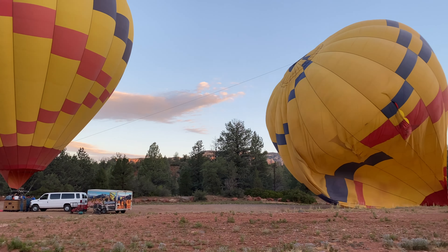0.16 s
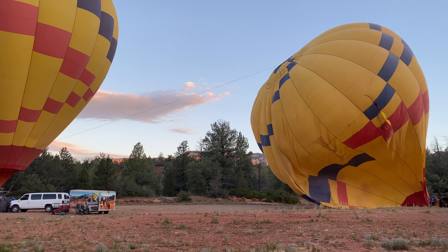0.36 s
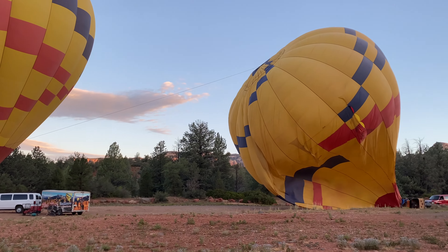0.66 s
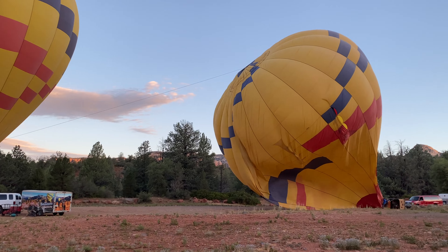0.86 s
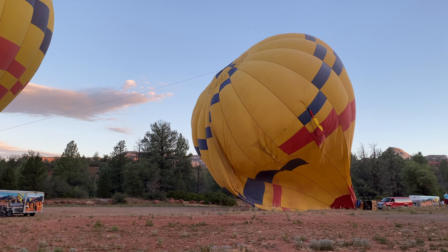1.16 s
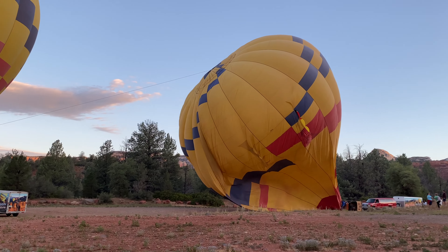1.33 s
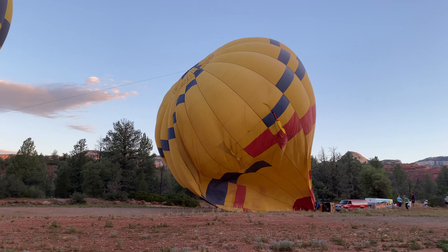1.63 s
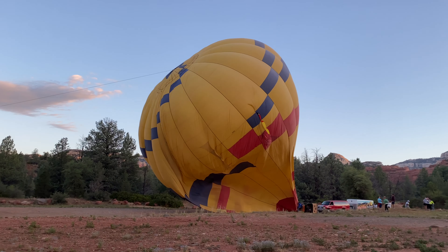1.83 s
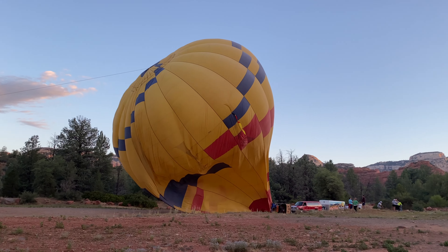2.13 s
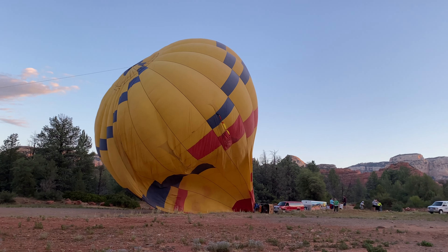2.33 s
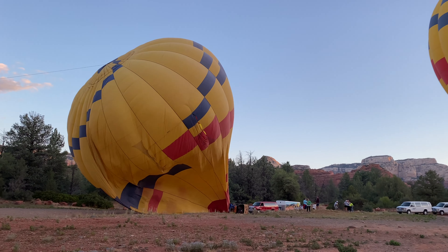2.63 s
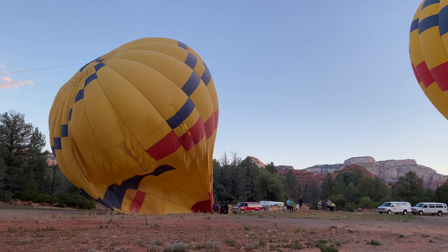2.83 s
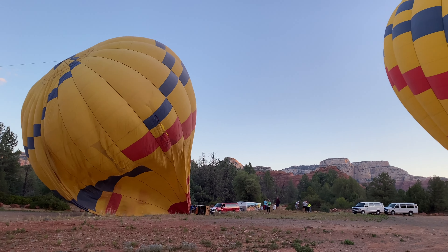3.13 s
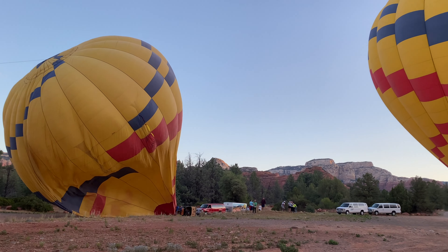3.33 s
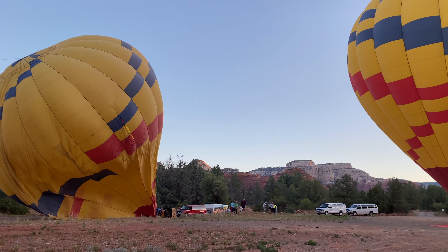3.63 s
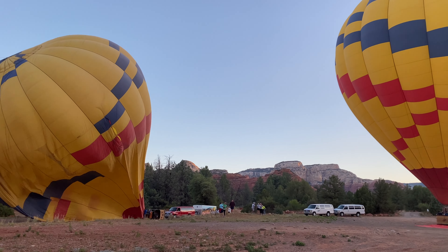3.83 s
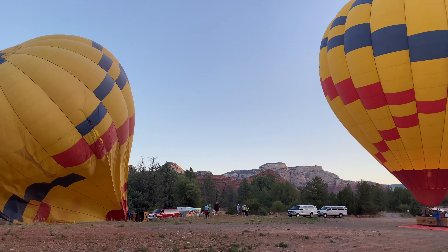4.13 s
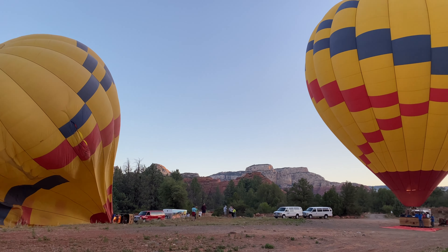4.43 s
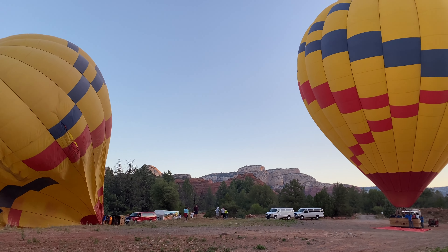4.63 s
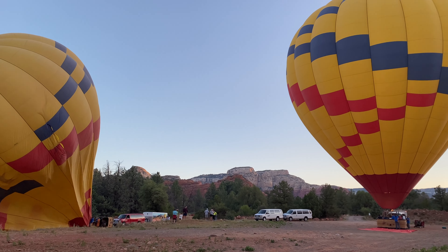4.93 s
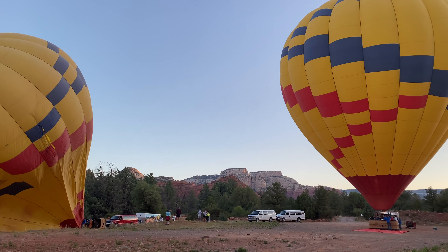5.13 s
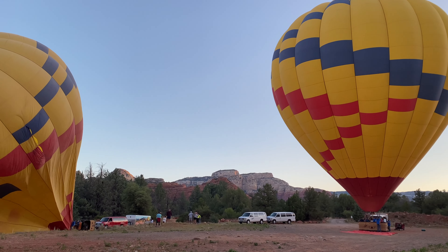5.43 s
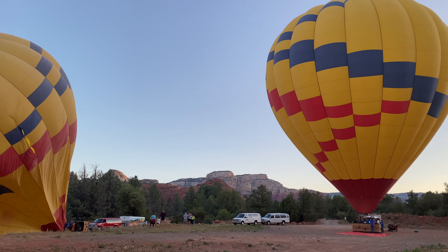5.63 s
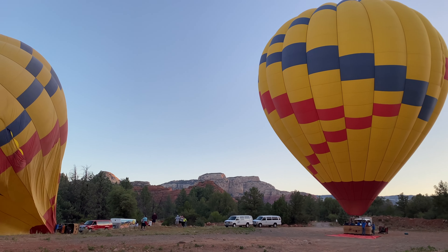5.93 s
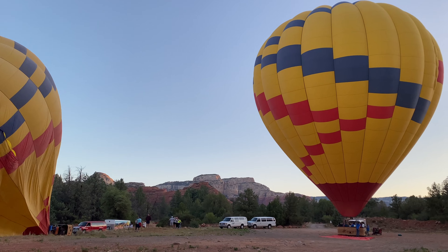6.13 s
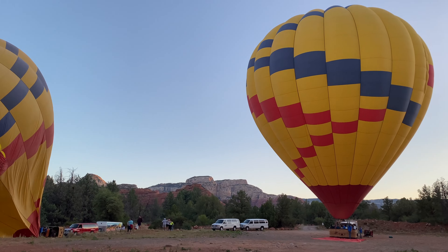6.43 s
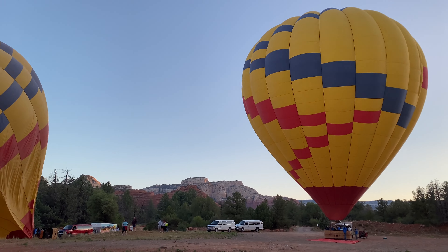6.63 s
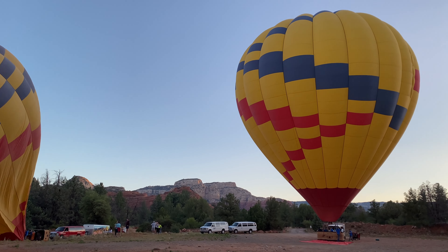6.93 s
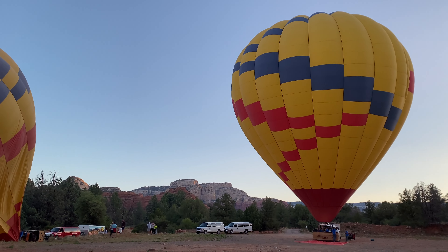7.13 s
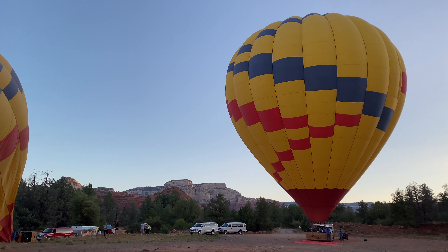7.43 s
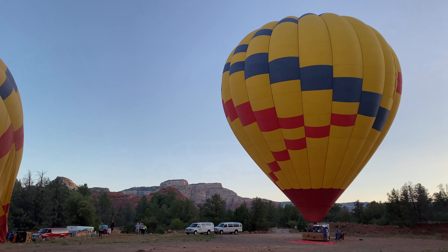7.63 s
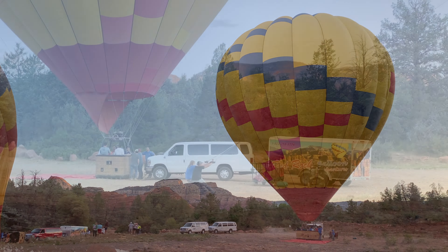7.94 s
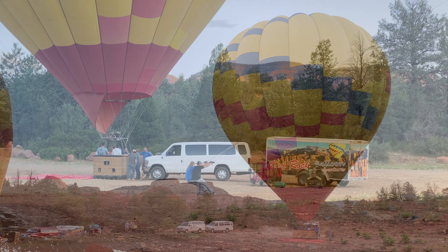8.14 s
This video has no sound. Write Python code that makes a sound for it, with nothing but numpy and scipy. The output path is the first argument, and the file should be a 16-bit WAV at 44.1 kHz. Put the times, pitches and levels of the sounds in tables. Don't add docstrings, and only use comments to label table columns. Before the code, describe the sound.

From 0 s, a small petrol engine drones steadily in an open field, a low, rough buzz with strong tones around 95 to 165 Hz and weaker ones near 300. Its pitch hardly moves. A three-blade fan adds a broad, breathy rush of air, lightly chopped by the engine's rhythm, with faint wavering blade tones. At about 2.3 s a propane burner ignites with a cluster of low thumps; gas hiss opens within a fraction of a second and a flame roar builds over the next second. From 3 to 6 s hiss, roar and lumpy rumble continue over the drone, with irregular dull thuds, stronger near 3.4 and 4.4 s. The jet eases after 6 s and is much thinner by 7.5 to 8 s, while rumble and thuds persist. The stereo image shifts gradually as the hand-held microphone turns. Engine and air continue to a slight fade ending around 8.3 s.

```python
import sys
import numpy as np
from scipy import signal
from scipy.io import wavfile
from scipy.ndimage import uniform_filter1d

SR = 44100
rng = np.random.default_rng(int(sys.argv[2]) if len(sys.argv) > 2 else 0)


def how_loud(loudness_db):
    steps = np.asarray(loudness_db, float) / 20
    return 10 ** steps


def master(y):
    cut = np.clip(np.atleast_2d(y).T, -1, 1)
    pcm = np.round(cut * 32767)
    wavfile.write(sys.argv[1], SR, pcm.astype(np.int16))


N = 364707
T = np.arange(N) / SR

# (time [s], four-stroke cycles [1/s])
CYCLE_RATE = [(0, 23.61), (.5, 23.59), (.75, 23.55), (1.0, 23.55), (1.25, 23.52), (1.5, 23.47),
              (1.75, 23.47), (2.0, 23.53), (3, 23.52), (4.5, 23.57), (6, 23.58), (8.3, 23.55)]
# (multiple of the cycle, level [dB])
EXHAUST_TONES = [(1, -32), (2, -15), (3, -14.5), (4, -4), (5, -9), (6, -2.5), (7, 0.5), (8, -4.5),
                 (9, -10.5), (10, -21), (11, -38), (12, -7), (13, -4), (14, -12), (15, -24.5), (16, -34),
                 (17, -18.5), (18, -13), (19, -25.5), (20, -61), (21, -39), (22, -24.5), (23, -25)]
# (multiple of the blade rate, rms level [dB])
BLADE_TONES = [(7, -86), (8, -52.5), (9, -55.5), (10, -58), (11, -54.5), (12, -68), (14, -59)]
LOAD_PHASE_TURNS = [-0.0046, -.05, 0.32, -0.036, -0.14, 0.52]
# (time [s], depth [dB])
TONE_LULLS = [
    [(0, -7), (1.38, -7), (1.75, -5.5), (3.09, -4), (3.5, -1), (4.1, -7), (5.04, -17.5)],
    [(0, -25), (.62, -4.5), (1.2, -8), (1.91, -9.5), (3.31, -1), (4.3, -21), (4.95, -2)],
    [(1.1, -6), (2.12, -14), (2.5, -18), (3.09, -3), (4.25, -17), (4.9, -4), (6.8, -5), (8.2, -13)],
]
# (time [s], level [dB])
AIR_LEVEL = [(0, -42.5), (2.7, -43), (3.8, -45), (6.2, -44.5), (8.27, -42.5)]
# (frequency [Hz], density [dB/Hz])
AIR_SPECTRUM = [(30, -30), (55, 1), (150, -3.5), (330, -3), (480, -6), (2000, -0.5), (3000, -9), (4300, -8),
                (5800, -10), (8000, -15.5), (12000, -22.5), (13500, -27), (14500, -33), (17000, -60)]
# (time [s], gas flow [dB], flame size [dB])
BURN_COURSE = [(2.33, -53, -28), (2.41, -51, -20), (2.46, -52.5, -29.5), (2.76, -50, -25.5),
               (3.22, -52, -29), (3.27, -56, -27.5), (3.52, -50.5, -24), (3.69, -53.5, -28.5),
               (4.55, -53.5, -25), (5.97, -56, -27.5), (6.37, -57.5, -32), (7.52, -66.5, -30.5),
               (7.92, -65, -31), (7.95, -70, -30.5), (8.04, -77, -28.5), (8.27, -75, -30.5)]
# (frequency [Hz], density [dB/Hz])
RUMBLE_SPECTRUM = [(18, -39), (30, -26), (59, 3), (128, -1.5), (173, -6), (237, -8.5), (290, -8.5),
                   (467, -24.5), (550, -28.5), (600, -38), (780, -53), (1320, -120)]
# (frequency [Hz], density [dB/Hz])
ROAR_SPECTRUM = [(250, -3), (500, 4), (1000, 6.5), (1600, -2), (2500, -35), (4000, -7.5), (6000, -23)]
# (frequency [Hz], density [dB/Hz])
JET_SPECTRUM = [(1500, -16.5), (3000, -5), (4500, 1.5), (6500, 1.5), (8000, -2.5), (11000, -6.5),
                (13500, -18), (15500, -18), (17000, -40)]
# (time [s], peak [dB], frequency [Hz], push 1 or pull -1)
LARGE_POCKETS = [(2.3309, -15, 215, 1), (2.345, -20, 52, 1), (2.3536, -14, 138, -1), (2.392, -13, 105, 1),
                 (2.4167, -15, 146, 1), (2.715, -18, 113, -1), (2.7475, -17, 120, -1),
                 (2.9361, -13, 135, 1), (3.0762, -14.5, 184, -1), (3.3592, -7.5, 114, -1),
                 (3.427, -14, 124, -1), (3.7837, -17, 152, 1), (4.1243, -14, 126, -1), (4.195, -18, 127, 1),
                 (4.4168, -6.5, 109, -1), (4.719, -11, 165, -1), (4.776, -13, 188, -1),
                 (4.8998, -12, 113, 1), (5.0731, -11.5, 146, -1), (5.116, -14, 130, -1),
                 (5.2933, -13, 142, -1), (5.5624, -15, 174, -1), (5.6465, -21, 151, 1),
                 (6.0093, -15, 152, -1), (6.536, -13.5, 138, 1), (6.7228, -12.5, 128, -1),
                 (7.0686, -17.5, 177, -1), (7.3666, -14, 98, -1), (7.5952, -17, 142, -1),
                 (8.0467, -12, 93, -1)]
# (time [s], heading [0 ahead, 1 fan far left])
MIC_HEADING = [(0, -0.54), (.6, -0.34), (1.15, -0.23), (1.9, -0.056), (2.3, 0.097), (2.9, 0.36),
               (3.7, 0.51), (4.5, 0.65), (5.4, 0.79), (6.3, 0.9), (8.27, 1.01)]
# (frequency [Hz], left lead ahead [rad], lead per turn [rad],
# left minus right ahead [dB], difference per turn [dB])
MID_PORTS = [(310, -0.079, 0.66, -1, 0.5), (2010, -0.32, 3, -4, 3), (2520, .54, 0.1, 2.3, 3.2),
             (3360, -0.78, 4, 5, 3.5), (4620, -1.01, 7, -6.5, 4.5), (5700, -0.56, 8.5, 0, -2.6),
             (6560, -0.31, 11, -11, 4.5), (7840, .75, 15, 2.5, 0)]
LOW_PORTS = [(20, 0, 0, -0.89, 0), (120, -0.031, 0, -1.6, 0)]
# (frequency [Hz], left lead [rad])
HIGH_PORT_LEAD = [(7800, 3.5), (8100, 3.2), (8800, 2.9), (11000, 0), (12300, -1.7), (13000, -3.0),
                  (14000, -3.4), (14800, -4.7)]
# (frequency [Hz], likeness [0-1])
PORT_LIKENESS = [(20, .985), (120, .995), (300, .87), (1200, .85), (4700, .72), (5500, .92), (6300, .74),
                 (7600, .88)]
# (frequency [Hz], turned one way [dB], turned the other way [dB])
BODY_SHADE = [(556, .5, 1), (1170, -3, 2.5), (2340, 0, 0.5), (3060, -1, 2.5), (4070, -2.5, 1),
              (5040, -0.5, 5.5), (5400, -3.5, 0), (6840, 1, -0.5), (8900, 1, -.5)]
# (frequency [Hz], level
# [dB])
WEAK_LIMIT = [(4000, -14), (5500, -12.5), (8400, -9), (10400, -6), (11400, -5.5), (12300, -7.5),
              (13500, -5.5)]
# (time [s], level [dB])
CLOSING_FADE = [(0, 0.5), (7.7, 1), (8.0, -1.5), (8.27, -6)]

EXHAUST_DB = -33
CLEAR_DB, LULL_S = (-52.5, -51.5, -50.5), 0.17
LIT_S, JET_OPEN_S = 2.315, 0.19
FULL_FLOW_DB, FULL_SIZE_DB = -55, -26
ROAR_DB, ROAR_BY_FLOW, ROAR_BY_SIZE, ROAR_LAG_S = -36.5, 0.34, 0.99, 1
ROAR_BUILD_DB, ROAR_BUILD_S = -7.5, 0.6
ROAR_TURN = -1.17
SMALL_COUNT, SMALL_HZ = 40, (86, 194)
SMALL_OVER_DB, SMALL_SPREAD_DB = 9.5, 0.5
SHADE_FROM = (0.035, 0.63)
TREBLE_LIKE, TREBLE_BEST_TURN, TREBLE_LOSS = 0.82, 0.35, 0.35


def evened(x):
    return x / np.sqrt(np.mean(x ** 2) + 1e-20)


def read(points, hz):
    f, *columns = np.transpose(points)
    return np.squeeze([np.interp(np.log(hz + 1), np.log(f + 1), c) for c in columns])


def curves(rows, t):
    s, *columns = np.transpose(rows)
    return np.squeeze([np.interp(t, s, c) for c in columns])


def drift(per_s, count=1):
    t, hz = T[::64], np.geomspace(0.0396 * per_s, per_s, 16)
    phase = rng.random((count, 16, 1))
    waves = np.sin(2 * np.pi * (hz[:, None] * t + phase)) / hz[:, None] ** 0.42
    return np.squeeze([np.interp(T, t, evened(row)) for row in waves.sum(1)])


def rush(colour, patchy_db, size=1024):
    hop = size // 4
    frames, hz = N // hop + 5, np.fft.rfftfreq(size, 1 / SR)
    a, b, c, d, patches = rng.standard_normal((frames, len(hz), 5)).T
    patches = evened(uniform_filter1d(uniform_filter1d(patches, 8, 0), 16, 1))
    level_db = read(colour, hz)[:, None] + patchy_db * patches
    z = np.array([a + 1j * b, c + 1j * d]) * how_loud(level_db)
    return evened(signal.istft(z, nperseg=size, noverlap=size - hop)[1][:, :N])


def fan():
    air_db = curves(AIR_LEVEL, T)
    rate = curves(CYCLE_RATE, T) * (1 + 0.0004 * drift(8))
    turns = np.cumsum(rate) / SR - 0.02
    late = np.array([[0], [0.25]])

    def order(k, db):
        k = int(k)
        blade = (k + 2) // 6
        spread = 0.13 * max(blade - 3, 0) ** 2
        stroke = 0.46 - 0.3875 * blade + LOAD_PHASE_TURNS[k % 6] + spread
        return how_loud(db) * np.cos(2 * np.pi * (k * turns + stroke + late))

    exhaust_sway = drift(5, count=len(EXHAUST_TONES))
    beats = sum(order(k, db + 0.6 * s) for (k, db), s in zip(EXHAUST_TONES, exhaust_sway))

    blade_sway = drift(9, count=len(BLADE_TONES))
    blades = sum(order(6 * k, db + 3.2 * s) for (k, db), s in zip(BLADE_TONES, blade_sway))
    clear_sway = drift(6, count=3)
    for k, db, rows, sway in zip((4, 5, 6), CLEAR_DB, TONE_LULLS, clear_sway):
        lull_db = sum(depth * np.exp(-((T - s) / LULL_S) ** 2) for s, depth in rows)
        blades = blades + order(6 * k, db + lull_db + 1.6 * sway + 2.5)

    once, twice, stroke = (np.cos(2 * np.pi * k * turns) for k in (1, 2, 6))
    chop = 1 + 0.23 * once + 0.033 * twice
    gate = 1 + 0.07 * once + 0.042 * twice + 0.055 * stroke
    air = how_loud(air_db + 4) * gate * rush(AIR_SPECTRUM, patchy_db=0.82)
    return how_loud(EXHAUST_DB - 0.17) * evened(beats) + np.sqrt(2) * chop * blades + air


def burner():
    flow_db, size_db = curves(BURN_COURSE, T)
    since_s = np.maximum(T - LIT_S, 0)
    lit = np.minimum(since_s / 0.02, 1)
    jet_open = np.minimum(since_s / JET_OPEN_S, 1)

    slow_db = uniform_filter1d(size_db, max(int(ROAR_LAG_S * SR), 1))
    roar_db = ROAR_DB + ROAR_BY_FLOW * (flow_db - FULL_FLOW_DB)
    roar_db = roar_db + ROAR_BY_SIZE * (slow_db - FULL_SIZE_DB)
    roar_db = roar_db + ROAR_BUILD_DB * np.exp(-since_s / ROAR_BUILD_S)

    swings, rule = thumps(size_db)
    lumps = evened(uniform_filter1d(uniform_filter1d(rng.standard_normal(N), 500), 500))
    flicker = drift(21)
    rumble = evened(how_loud(0.54 * lumps) * rush(RUMBLE_SPECTRUM, patchy_db=0.56, size=2048))
    rumble = rumble * (1 - 0.68 * rule)
    roar = how_loud(0.1 * flicker) * rush(ROAR_SPECTRUM, patchy_db=1.5)
    jet = how_loud(0.5 * flicker + 0.22 * lumps) * rush(JET_SPECTRUM, patchy_db=1.0)

    flame = lit * how_loud(size_db + 0.06) * rumble + jet_open * how_loud(flow_db + 9) * jet + swings
    return flame, lit * how_loud(roar_db - 1.5) * roar


def thumps(size_db):
    out, rule = np.zeros(N + SR), np.zeros(N + SR)
    t = np.arange(-1500, 2000) / SR
    when, strength, pitch, push = rng.random((SMALL_COUNT, 4)).T
    span_s = T[-1] - LIT_S - 0.2
    at_s = LIT_S + 0.15 + span_s * (np.arange(SMALL_COUNT) + when) / SMALL_COUNT
    small_db = np.interp(at_s, T, size_db) + SMALL_OVER_DB + SMALL_SPREAD_DB * (2 * strength - 1)
    small_hz = SMALL_HZ[0] + (SMALL_HZ[1] - SMALL_HZ[0]) * pitch
    small = zip(at_s, small_db, small_hz, push - 0.65)
    for s, db, hz, sign in [*LARGE_POCKETS, *small]:
        shape = np.exp(-(t * hz / np.where(t < 0, 0.7, 0.9)) ** 2)
        start = round(s * SR) - 1500
        at = slice(start, start + len(t))
        out[at] += np.sign(sign) * how_loud(db - 6.0) * shape * np.cos(2 * np.pi * hz * t)
        rule[at] = np.maximum(rule[at], shape)
    return out[:N], rule[:N]


def heard(dry, turn):
    hz, t, (direct, scattered) = signal.stft(dry, SR, nperseg=1024, noverlap=768)
    heading = curves(MIC_HEADING, t) + turn
    treble = (hz > 7750)[:, None]

    ports = read(list(LOW_PORTS) + list(MID_PORTS), hz)
    lead, lead_turn, lr_db, lr_turn = ports[:, :, None]
    lead = np.where(treble, read(HIGH_PORT_LEAD, hz)[:, None], lead + lead_turn * heading)
    balance_db = np.where(treble, 0, lr_db + lr_turn * heading)

    treble_like = TREBLE_LIKE - TREBLE_LOSS * (heading - TREBLE_BEST_TURN) ** 2
    like = np.clip(np.where(treble, treble_like, read(PORT_LIKENESS, hz)[:, None]), 0, 1)
    right = like * np.exp(-1j * lead) * direct + np.sqrt(1 - like ** 2) * scattered

    one_db, other_db = read(BODY_SHADE, hz)[:, :, None]
    shade_db = one_db * np.clip((SHADE_FROM[0] - heading) / 0.21, 0, 1)
    shade_db = shade_db + other_db * np.clip((heading - SHADE_FROM[1]) / 0.3, 0, 1)
    pair = np.array([direct * how_loud(0.53 * balance_db), right * how_loud(-0.4 * balance_db)])
    return hz, pair * how_loud(shade_db)


def without_weak_side(pair, hz):
    both = np.array([pair[0] + pair[1], pair[0] - pair[1]]) / 2
    band, block = np.arange(len(hz)) // 8, np.arange(both.shape[2]) // 4
    power = np.add.reduceat(abs(both) ** 2, np.flatnonzero(np.diff(band, prepend=-1)), axis=1)
    power = np.add.reduceat(power, np.flatnonzero(np.diff(block, prepend=-1)), axis=2)
    part = (power / (power.sum(0) + 1e-30))[:, band][:, :, block]
    strong = part > how_loud(2 * read(WEAK_LIMIT, hz))[:, None]
    both = both * (strong | (hz < 4000)[:, None])
    return np.array([both[0] + both[1], both[0] - both[1]])


def scene():
    flame, roar = burner()
    hz, pair = heard(fan() + flame, 0)
    pair = pair + heard(roar, ROAR_TURN)[1]
    return signal.istft(without_weak_side(pair, hz), SR, nperseg=1024, noverlap=768)[1][:, :N]


def roll_off(x):
    return signal.sosfilt(signal.butter(12, 15900, fs=SR, output="sos"), x)


def record(dry):
    low_cut = signal.butter(2, 32, "high", fs=SR, output="sos")
    mix = signal.sosfiltfilt(low_cut, dry) * how_loud(curves(CLOSING_FADE, T))
    return roll_off(mix)


dry = scene()
out = record(dry)
master(out)
```